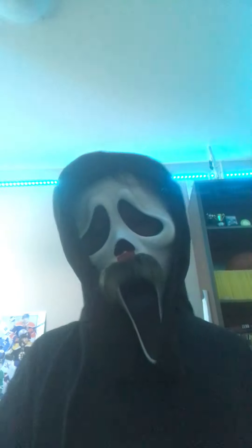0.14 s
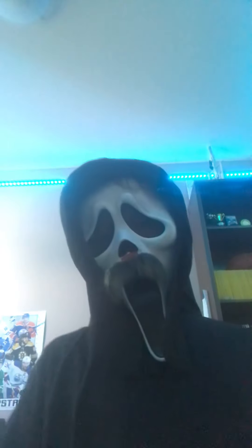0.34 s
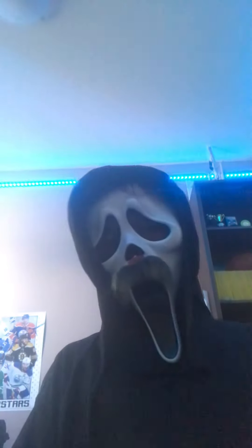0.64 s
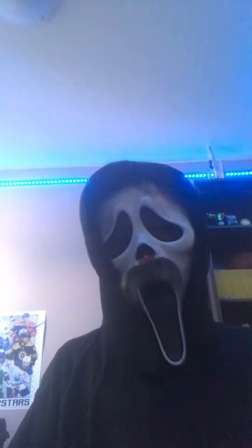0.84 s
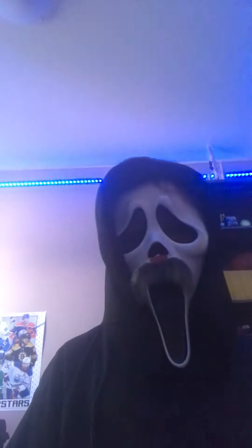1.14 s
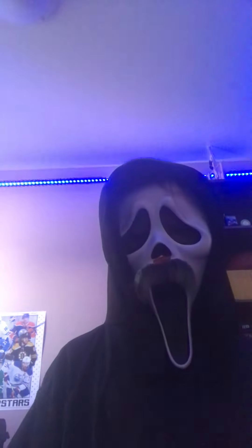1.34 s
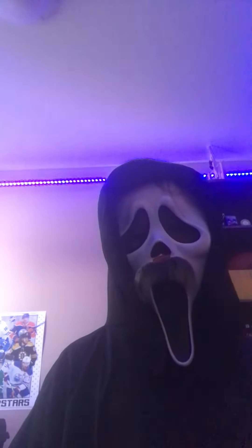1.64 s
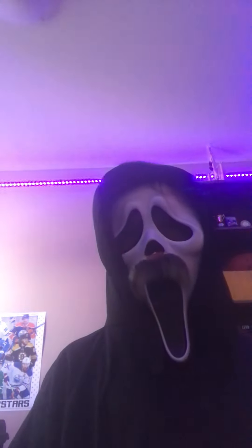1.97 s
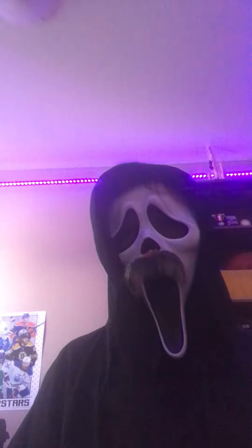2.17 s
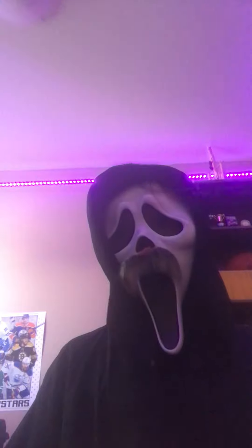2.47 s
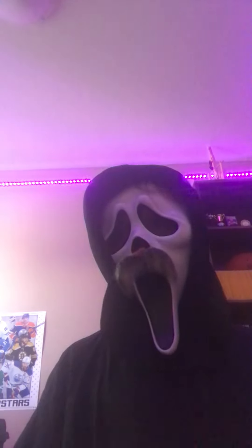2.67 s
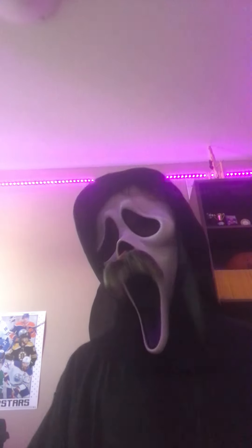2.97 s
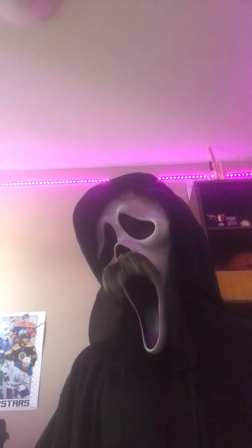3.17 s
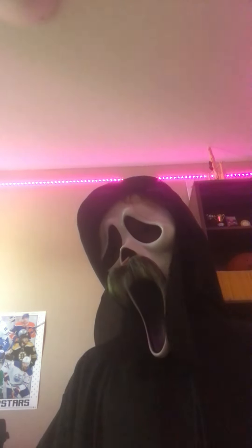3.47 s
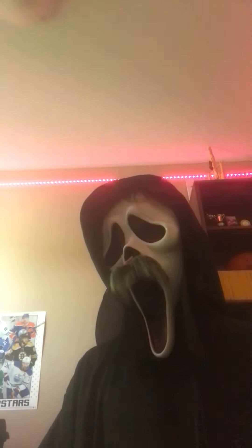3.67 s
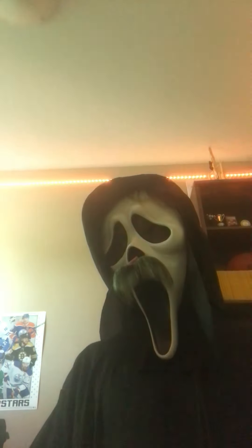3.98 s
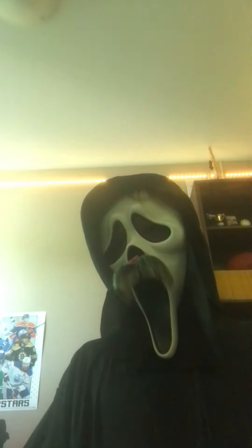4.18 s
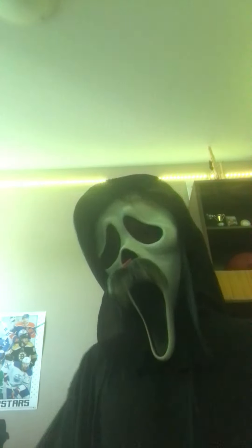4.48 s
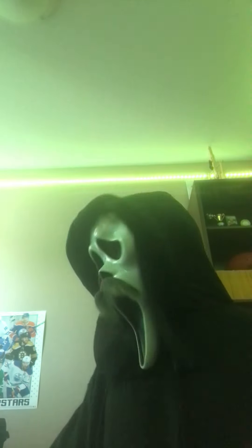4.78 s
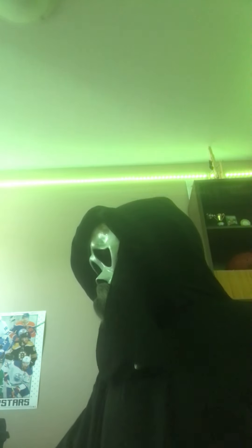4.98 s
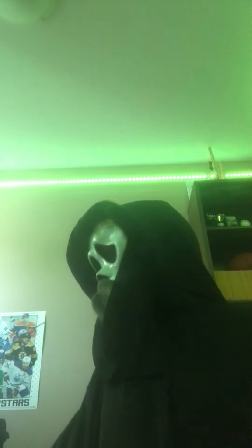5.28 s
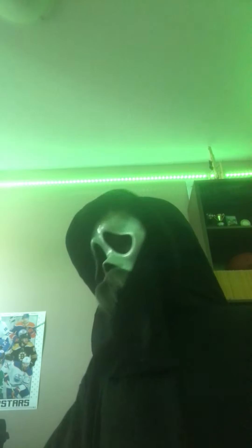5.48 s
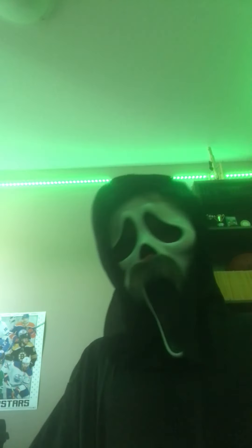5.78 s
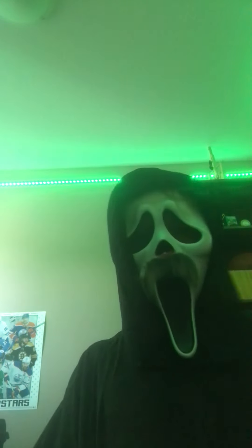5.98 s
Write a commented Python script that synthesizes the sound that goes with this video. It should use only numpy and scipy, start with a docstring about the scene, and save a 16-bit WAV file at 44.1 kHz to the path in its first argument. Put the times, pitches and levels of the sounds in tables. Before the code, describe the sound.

Fast typing on a plastic keyboard fills about six seconds, heard by one nearby microphone in a small quiet room. It starts at once with tightly packed, uneven clicks: short dull mid-pitched knocks of keycap and case, each with a crisp brighter tick, and lighter release clicks between. Harder clacks stand out at about 0.55, 0.65, 2.2, 2.67 and 2.77 seconds, with a particularly dense run from 1.45 to 2.3. Loose keys rattle faintly throughout, and hands bump the desk in soft, low thuds. After 3 seconds the strokes are generally lighter, with slightly wider gaps, still hurried and irregular. Around 5.6 to 5.95 typing thins and quiets, then a quick small flurry closes the scene from 5.98 to 6.1. Low rumble and soft hiss lie underneath; the echo is faint and very short.

```python
"""Fast typing, small quiet room

Fast typing on a plastic keyboard in a small quiet room, heard by one microphone nearby.
Each key knocks on its stop or springs back: a few ms of chatter rings modes of keycap, case and stem.
Loose keys rattle faintly in between as random touches on the same parts, and the desk thuds in low modes.
Coloured noise is the room's rumble and hiss; feedback delays are its echo of the typing."""
import sys
import numpy as np
from scipy import signal
from scipy.fft import rfft, irfft, next_fast_len
from scipy.io import wavfile

SR = 44100
rng = np.random.default_rng(int(sys.argv[2]) if len(sys.argv) > 2 else 0)


def master_out(mix):
    """Clip the mix to full scale and print it as 16-bit PCM to the path in sys.argv[1]."""
    frames = np.transpose(np.atleast_2d(mix))
    ceiling = np.clip(frames, -1, 1)
    pcm = np.round(ceiling * 32767).astype(np.int16)
    wavfile.write(sys.argv[1], SR, pcm)


N = 269892


def from_db(db):
    """Amplitude ratio of a level in dB."""
    return 10 ** (np.asarray(db) / 20)


def rms_one(x):
    """Scale a signal to an RMS of 1."""
    return x / np.sqrt(np.mean(x ** 2) + 1e-20)


def in_time(rows):
    """Straight lines between (t/s, value) rows, one value per sample."""
    s, value = np.transpose(rows)
    return np.interp(np.arange(N) / SR, s, value)


def ring(force, hz, t60):
    """A damped resonator: a unit click sets a sine of height 1 ringing."""
    radius = from_db(-60 / (t60 * SR))
    turn = 2 * np.pi * hz / SR
    # the tiny offset keeps the decay clear of very slow, minute numbers
    return signal.lfilter([0, np.sin(turn)], [1, -2 * radius * np.cos(turn), radius ** 2], force + 1e-18)


# Room tone, rumble up to hiss: f/Hz, relative density/dB per Hz
ROOM_TONE = [(25, -11), (47, -3), (70, -2), (125, -6), (170, -1), (330, -4.5), (600, -5.5), (800, -23.5),
             (1300, -2.5), (3900, -19), (16000, -45)]
# Level of the room tone, sinking towards the end: t/s, RMS level/dB
ROOM_TONE_LEVEL = [(0, -57.5), (5.4, -59), (5.8, -59.5), (6.12, -65)]


def air():
    """Rumble and hiss of the quiet room: noise coloured by the room's spectrum."""
    hz, db = np.transpose(ROOM_TONE)
    bins = np.maximum(np.arange(N // 2 + 1) * SR / N, 1)
    colour = from_db(np.interp(np.log(bins), np.log(hz), db))
    noise = irfft(rfft(rng.standard_normal(N)) * colour, N)
    return from_db(in_time(ROOM_TONE_LEVEL)) * rms_one(noise)


def brushes(per_s, last_s, spread_db):
    """Fingers brush loose keys now and then: a gain that swells for a few ms, mean power 1."""
    starts = (rng.random(N) < per_s / SR) * from_db(spread_db * rng.standard_normal(N))
    return rms_one(np.convolve(starts, np.hanning(int(2 * last_s * SR)), "same"))


def shaking(below_db, settle_s, travel_db, travel_s):
    """A key scrapes along its guide just before the contact; the neighbours shake after it and settle."""
    s, level_db = np.transpose(CONTACTS)[:2]
    jolts = np.bincount(np.round(s * SR).astype(int), from_db(2 * level_db), N)   # powers
    after = signal.lfilter([1], [1, -np.exp(-2 / (settle_s * SR))], jolts)
    # run backwards in time, so that it grows towards the contact
    before = signal.lfilter([1], [1, -np.exp(-2 / (travel_s * SR))], jolts[::-1])[::-1]
    return np.sqrt(from_db(-2 * below_db) * after + from_db(-2 * travel_db) * before)


# Keyboard case and keycaps, the dull knock: f/Hz, relative level/dB, t60/s
CASE_MODES = [(322, -7.5, 0.045), (413, -10, 0.048), (592.5, -14, 0.077), (1105, 0.5, 0.017),
              (1280, -16, 0.048), (1600, 1.5, 0.011), (1844, 4, 0.0084), (2000, -5.5, 0.0065),
              (2460, 2.5, 0.0076), (2844, -6, 0.0099), (3095, 4.5, 0.006), (3522, 2, 0.0083),
              (4190, 6, 0.0041), (4530, -4, 0.011)]
# Stems and stabiliser wires, the bright tick: f/Hz, relative level/dB, t60/s
STEM_MODES = [(5020, 8, 0.002), (6000, 2, 0.011), (6730, 8.5, 0.0022), (7680, -2, 0.0026),
              (8840, -0.5, 0.0087), (12080, -15.5, 0.021), (12300, -14.5, 0.0043), (13900, -12, .005),
              (15300, -11.5, 0.0057)]
# Loose keys under moving fingers, before brushes and shaking: t/s, level/dB
LOOSE_KEYS = [(0.0, -49), (1.3, -50), (2.1, -49), (3.5, -53.5), (5.3, -49.5), (5.6, -54.5), (5.92, -60.5),
              (6.12, -52)]


def rattle(per_s, spread_db, tick_db):
    """Small random touches of loose keys, dealt to the modes of case and stems; loose stems are damped."""
    sizes = from_db(spread_db * np.minimum(rng.exponential(1, N), 4))
    touches = sizes * (rng.random(N) < per_s / SR)
    loose_stems = [(hz, db + tick_db, min(t60, 0.003)) for hz, db, t60 in STEM_MODES]
    modes = list(CASE_MODES) + loose_stems
    drives = [from_db(db) * touches * rng.standard_normal(N) for hz, db, t60 in modes]
    brushed = 0.64 + 0.83 * brushes(per_s=35.0, last_s=0.0054, spread_db=3.0)
    shaken = shaking(below_db=10.5, settle_s=0.014, travel_db=5.5, travel_s=0.0027)
    level = from_db(in_time(LOOSE_KEYS)) * brushed + shaken
    steady = sum(ring(drive, hz, t60) for drive, (hz, db, t60) in zip(drives, modes))
    loudness = np.sqrt(np.mean(steady ** 2))
    return sum(ring(drive * level / loudness, hz, t60) for drive, (hz, db, t60) in zip(drives, modes))


# Desk top: f/Hz, relative level/dB, t60/s
DESK_MODES = [(47.8, 0.5, 0.17), (88.5, 0.5, 0.069), (129, -2, 0.091), (221, -2, 0.083)]


def desk(level_db):
    """The hands' weight bumps the desk top unevenly while they type, ringing its low modes."""
    weight = shaking(below_db=-4.0, settle_s=0.019, travel_db=5.0, travel_s=0.024) ** 0.33   # evened out
    push = weight * rng.standard_normal(N) * (rng.random(N) < 200 / SR)
    thuds = sum(ring(from_db(db) * push, hz, t60) for hz, db, t60 in DESK_MODES)
    return from_db(level_db) * rms_one(thuds)


PEAK_AT = 350   # samples of swell before a contact's peak
# Typical chatter length scale at a firm contact; harder contacts are shorter (log units per dB)
CONTACT_MS, FIRM_DB, SHORTER_PER_DB, LENGTH_SCATTER = 5.03, -29, .004, 0.25


def chatter(rise, fall, per_s):
    """Force of each contact: uneven tiny clicks that swell and die in shares of its length."""
    draws = rng.random((len(CONTACTS), 2, 3 * PEAK_AT))
    harder_db = np.array(CONTACTS)[:, 1:2] - FIRM_DB
    scatter = LENGTH_SCATTER * rng.standard_normal((len(CONTACTS), 1))
    stretch = np.exp(-SHORTER_PER_DB * harder_db + scatter)
    length_s = np.clip(CONTACT_MS / 1000 * stretch, .002, .014)
    t = np.arange(-PEAK_AT, 2 * PEAK_AT) / SR / length_s   # in contact lengths
    swell = np.exp(-np.where(t < 0, (t / rise) ** 2, np.abs(t / fall) ** 0.99))
    height = draws[:, 1] - .5
    clicks = (draws[:, 0] < per_s / SR) * (height + 0.31 * np.sign(height))   # none is very small
    return clicks * swell


STRENGTH_SCATTER_DB = 2.5
KEY_DETUNE = .05   # each key rings a little off the common modes, as a share of their frequency
LEVEL_OVER_S = .008   # a contact's energy equals its level held this long
FORCE_LEADS_S = .001   # the force peaks this long before the contact's listed time


def struck(modes, force, level_db, lean_db):
    """Every contact drives each mode with its own strength, sign and tuning, scaled to the contact's level."""
    draws = rng.standard_normal((3, len(modes), len(CONTACTS), 1))
    t, size = np.arange(3 * PEAK_AT) / SR, 6 * PEAK_AT
    lean_db = np.broadcast_to(lean_db, (len(CONTACTS), len(modes))).T[:, :, None]
    body = 0
    for (hz, db, t60), lean, sign, strength, tune in zip(modes, lean_db, *draws):
        decay = from_db(db + lean + STRENGTH_SCATTER_DB * strength - 60 * t / t60)
        body = body + np.sign(sign) * decay * np.sin(2 * np.pi * hz * (1 + KEY_DETUNE * tune) * t)
    fade = np.hanning(2 * len(t))[len(t):]
    rings = irfft(rfft(force, size) * rfft(body * fade, size), size)
    energy = np.sum(rings ** 2, axis=1)
    rings = rings * (from_db(level_db) * np.sqrt(LEVEL_OVER_S * SR / energy))[:, None]
    peak = np.round((np.array(CONTACTS)[:, :1] - FORCE_LEADS_S) * SR).astype(int)
    at = peak + np.arange(size) - PEAK_AT
    return np.bincount(at.ravel(), rings.ravel(), N)[:N]


# Key contacts: t/s, knock level/dB over 8 ms at the key, centre of the knock f/Hz, tick against knock level/dB
CONTACTS = [(0.057, -30, 2000, -3.5), (0.078, -33, 2580, -9), (0.098, -41, 2100, -6),
            (0.115, -38, 2210, -7), (0.13, -28, 1950, -3.5), (0.141, -26.5, 1860, -9),
            (0.167, -30.5, 2050, -12), (0.191, -37.5, 2310, -12), (0.205, -43, 1940, -2),
            (0.214, -23.5, 2400, -9.5), (0.234, -43, 2410, 1), (0.29, -38, 2540, -7), (0.3, -35, 2820, -17),
            (0.306, -28.5, 2510, 1.5), (0.322, -29, 2510, -19), (0.36, -41, 2260, -5),
            (0.392, -35.5, 2510, -4), (0.401, -27, 2060, -8), (0.41, -32, 1760, -4), (0.425, -41, 1930, -6),
            (0.446, -23.5, 2440, -8.5), (0.548, -16.5, 2300, -11.5), (0.562, -45, 2100, -10),
            (0.578, -36.5, 2010, -0.5), (0.59, -38.5, 2160, -1), (0.599, -35, 2400, -8),
            (0.647, -31, 2300, -15), (0.653, -21, 2130, -14), (0.672, -35, 2030, -9),
            (0.681, -31.5, 2060, -11), (0.689, -22, 2470, -10), (0.705, -37, 2340, -5),
            (0.812, -32.5, 1620, -9), (0.836, -29, 2000, -10), (0.857, -37, 2150, -8),
            (0.895, -35, 2170, -9.5), (0.913, -25, 2760, -12), (0.941, -27, 1630, -11.5),
            (0.988, -39.5, 1990, -7), (1.0, -35.5, 2500, -8.5), (1.062, -30.5, 2260, -12),
            (1.076, -33.5, 2460, -3.5), (1.087, -39, 2360, -14), (1.092, -35, 2240, -11),
            (1.102, -44, 2840, -4), (1.116, -37, 2120, 5), (1.125, -33.5, 2770, -1.5),
            (1.18, -30, 2140, -7.5), (1.196, -24.5, 2570, -8), (1.226, -34, 1860, -14),
            (1.325, -26.5, 1830, -9.5), (1.381, -25.5, 2090, -13.5), (1.45, -30, 2280, -5.5),
            (1.471, -25, 1950, -10), (1.488, -28, 1980, -11), (1.502, -29.5, 2430, -3),
            (1.517, -36, 2480, 3.5), (1.536, -37, 1590, -7), (1.556, -37, 2870, -13),
            (1.569, -34.5, 2470, -5.5), (1.576, -40, 1610, -14), (1.594, -28.5, 3040, -16),
            (1.622, -29, 1990, -7.5), (1.64, -42, 2200, -6), (1.649, -41, 2810, -1),
            (1.664, -36.5, 2840, -6), (1.672, -26.5, 1870, -9), (1.688, -38, 1850, -14),
            (1.701, -29, 2260, -4.5), (1.711, -27.5, 2500, -7.5), (1.787, -35, 2270, -9),
            (1.801, -29.5, 2450, -6), (1.816, -33, 1380, -7), (1.825, -29.5, 1710, -11),
            (1.84, -25.5, 2470, -9), (1.847, -29.5, 2780, -12), (1.881, -38, 2740, -7),
            (1.891, -36, 1910, -5), (1.91, -33, 1930, -6), (1.92, -36, 2610, -6), (1.958, -33.5, 1750, -13),
            (1.985, -30, 2910, -5.5), (2.005, -36.5, 2830, -11), (2.019, -31, 1840, -11),
            (2.039, -37, 1910, -5), (2.056, -34, 2060, -12), (2.067, -31, 2190, 2.5),
            (2.146, -31, 1840, -2.5), (2.163, -39.5, 1710, 2), (2.172, -29.5, 2310, 1.5),
            (2.183, -37, 2770, 2), (2.202, -21, 2950, -2.5), (2.233, -25.5, 2220, -14),
            (2.242, -37, 1830, -4), (2.255, -26, 3120, -7.5), (2.275, -32, 2180, -3.5),
            (2.347, -29, 1970, -3), (2.355, -35, 1920, -5), (2.394, -36, 2210, -8),
            (2.402, -31.5, 2620, -13), (2.416, -44, 2490, -7), (2.425, -42, 2160, -14),
            (2.455, -48, 2980, 4), (2.486, -41, 2220, -1), (2.492, -42.5, 2120, 4), (2.5, -43, 2680, -7),
            (2.529, -35, 2720, -1.5), (2.551, -34, 2040, -7), (2.558, -27, 1890, -6.5),
            (2.585, -29, 2550, -8.5), (2.597, -46, 2140, 0), (2.654, -43, 2530, -20), (2.67, -23, 2600, -9),
            (2.765, -20, 2000, -10.5), (2.784, -30.5, 2200, -1), (2.792, -28.5, 2500, -1.5),
            (2.803, -43, 1920, 0), (2.866, -42.5, 2570, -2), (2.944, -24, 2670, -9), (2.968, -43, 2140, 1),
            (2.979, -35, 2760, -1.5), (3.001, -30, 1680, -13), (3.024, -32.5, 2320, -7),
            (3.046, -26, 3080, -13), (3.052, -29.5, 2600, -8), (3.065, -28, 2440, -5.5),
            (3.118, -38.5, 2530, -9), (3.177, -27, 1810, -11), (3.244, -29, 2280, -9.5),
            (3.253, -37.5, 2820, 0.5), (3.273, -33.5, 2520, -10), (3.346, -34.5, 1970, -9.5),
            (3.367, -32.5, 2060, -15), (3.381, -40, 2150, -19), (3.386, -36.5, 2220, -8.5),
            (3.476, -34.5, 2100, -5), (3.53, -36.5, 1830, -6.5), (3.584, -36.5, 2650, -20),
            (3.595, -30.5, 2600, -11.5), (3.645, -40, 2170, -4.5), (3.711, -35, 2420, -7),
            (3.728, -41, 2330, 2), (3.747, -30, 2020, -5), (3.764, -30.5, 2680, 0), (3.784, -26, 2580, -4),
            (3.854, -34.5, 1700, -11), (3.896, -38.5, 2940, 0.5), (3.967, -36.5, 2300, -6),
            (3.991, -30, 2410, -7), (4.007, -26.5, 2100, -6.5), (4.037, -28, 2510, -6.5),
            (4.044, -38.5, 2260, -10), (4.116, -36.5, 2450, -9), (4.136, -29.5, 2650, -13),
            (4.167, -38, 2510, -9), (4.205, -36.5, 2780, -5), (4.277, -26.5, 2860, -10.5),
            (4.288, -40.5, 2520, -8), (4.3, -41, 2650, -9), (4.401, -39, 2200, -6), (4.409, -41, 2630, -5),
            (4.421, -42, 2390, -9), (4.429, -37, 1680, -22), (4.452, -32, 1740, -9.5),
            (4.533, -37.5, 2060, -3), (4.549, -33.5, 1800, -8), (4.559, -31, 2600, -8),
            (4.589, -30, 2430, -10), (4.598, -36.5, 2510, 0), (4.645, -49, 2380, 2.5),
            (4.682, -38.5, 2250, -11), (4.748, -34.5, 1810, -9), (4.821, -42.5, 2970, -5),
            (4.841, -32, 2630, -5), (4.945, -26, 2300, -9), (4.968, -38, 2180, -6),
            (5.043, -32.5, 2600, -6.5), (5.063, -42.5, 2300, 1), (5.128, -34, 2200, -3.5),
            (5.149, -30.5, 2720, -7), (5.157, -33.5, 2220, -12), (5.172, -30, 2510, -5),
            (5.185, -34.5, 2150, -5), (5.264, -38, 2740, -2.5), (5.296, -41, 2530, -9),
            (5.306, -35, 2200, -10), (5.336, -36.5, 2180, -21), (5.406, -37, 2300, -6.5),
            (5.433, -29, 2420, -8), (5.444, -34, 2050, -9), (5.453, -40, 2770, -5), (5.461, -41, 2430, -5),
            (5.57, -32, 2300, -11.5), (5.624, -32, 1960, -11.5), (5.688, -46, 1930, -12),
            (5.728, -42, 1660, -15), (5.772, -36.5, 2280, -8), (5.856, -52, 2500, -9),
            (5.981, -35.5, 2520, -4), (6.017, -29.5, 2930, -9), (6.036, -44, 2850, 0),
            (6.047, -38, 2730, -3), (6.071, -33.5, 2560, -4), (6.083, -31, 1900, -25),
            (6.096, -44, 2180, -21)]


def keys():
    """Dull knock of the case and bright tick of the stem, rung by one force at every contact."""
    s, level_db, centre_hz, tick_db = np.transpose(CONTACTS)
    force = chatter(rise=0.32, fall=0.47, per_s=6000)
    octaves_off = np.clip(np.log2(np.array(CASE_MODES)[:, 0] / centre_hz[:, None]), -1, 1)
    knock = struck(CASE_MODES, force, level_db, -14.0 * octaves_off ** 2)   # modes near the centre lead
    tick = struck(STEM_MODES, force, level_db + tick_db, 0)
    return knock + tick


ROOM_T60_S, WALL_CUT_HZ, ROOM_DB = 0.24, 3460, -21


def room(x):
    """Small-room echo: ten feedback delays, duller on every round."""
    size = next_fast_len(N + SR)
    turn = np.exp(-2j * np.pi * np.arange(size // 2 + 1) / size)   # one sample of delay
    dull = np.exp(-2 * np.pi * WALL_CUT_HZ / SR)
    wall = (1 - dull) / (1 - dull * turn)
    echoes = 0
    for k, lag in enumerate((rng.uniform(.004, .02, 10) * SR).astype(int)):
        loop = from_db(-60 * lag / SR / ROOM_T60_S) * wall * turn ** lag
        echoes = echoes + (-1) ** k * loop / (1 - loop)
    return irfft(rfft(x, size) * echoes, size)[:N]


def scene():
    """Typing and its echo, over the desk and the room tone, on one channel."""
    typing = keys() + rattle(per_s=3000, spread_db=2.5, tick_db=-4.5)
    # small parts radiate little bass
    thin = signal.sosfilt(signal.butter(2, 500, "high", fs=SR, output="sos"), typing)
    typing = from_db(-1.5) * thin + from_db(-13.5) * typing
    return (typing + from_db(ROOM_DB) * room(typing) + desk(level_db=-54.5) + air())[None]


OVERLOAD_AT = .7   # amplitude that rounded peaks approach
CUTOFF_HZ = 16600   # 60 dB down from here up


def record(dry):
    """The microphone loses the deepest bass and rounds the hardest peaks; the top is cut steeply."""
    dry = signal.sosfilt(signal.butter(4, 40, "high", fs=SR, output="sos"), dry)
    dry = OVERLOAD_AT * np.tanh(dry / OVERLOAD_AT)
    return signal.sosfilt(signal.cheby2(12, 60, CUTOFF_HZ, fs=SR, output="sos"), dry)


dry = scene()
out = record(dry)
master_out(out)
```